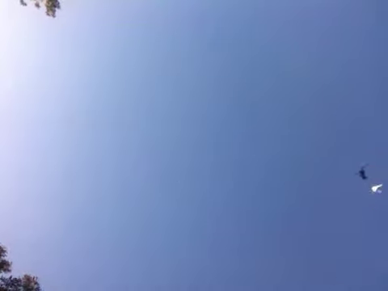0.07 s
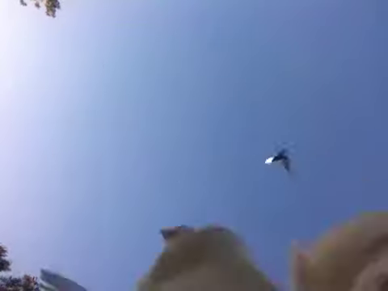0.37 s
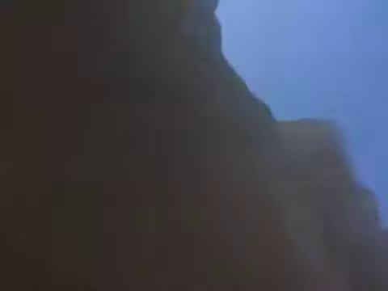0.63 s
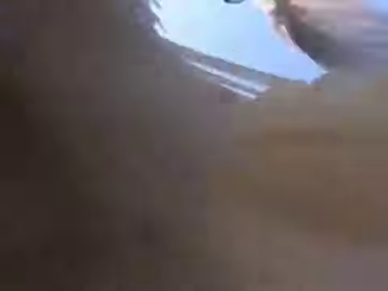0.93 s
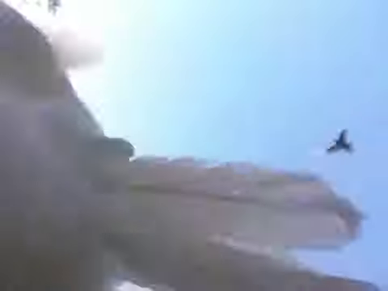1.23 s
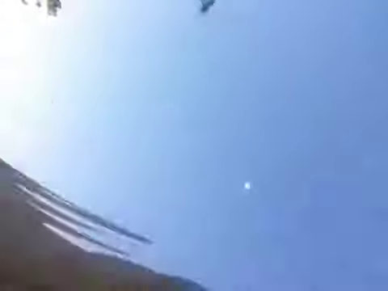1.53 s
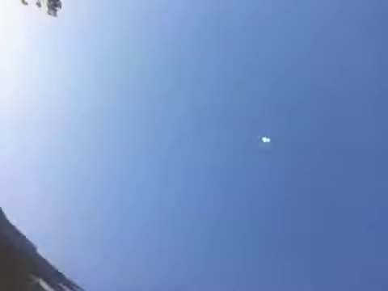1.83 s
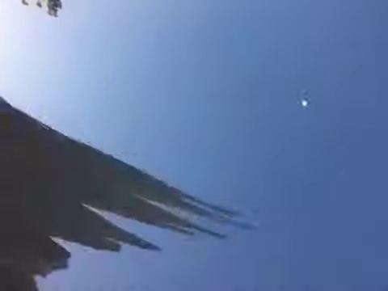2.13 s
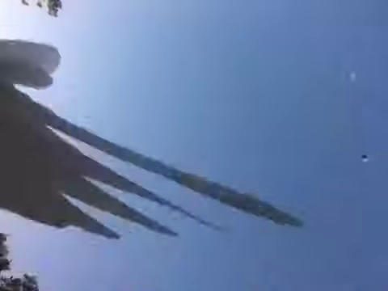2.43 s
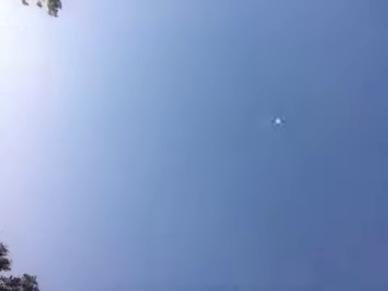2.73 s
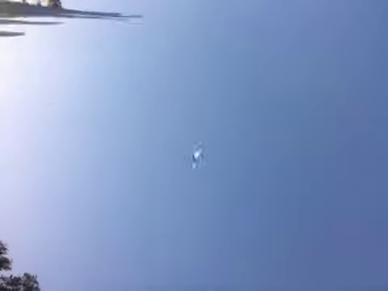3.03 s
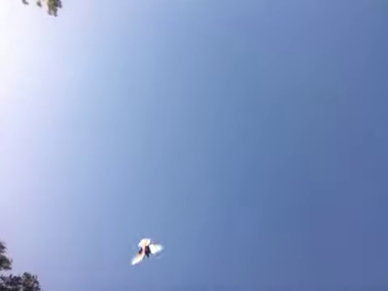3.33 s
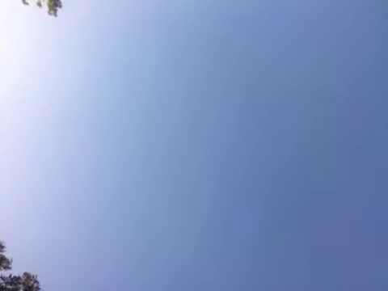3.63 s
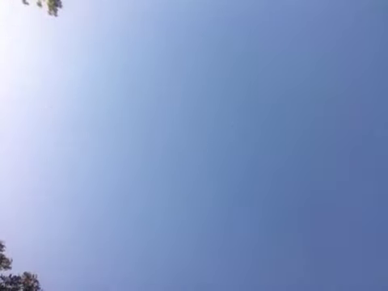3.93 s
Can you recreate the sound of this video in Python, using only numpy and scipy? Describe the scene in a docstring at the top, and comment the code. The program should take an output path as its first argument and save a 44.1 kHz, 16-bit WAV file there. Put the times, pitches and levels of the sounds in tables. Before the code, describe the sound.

A pigeon lands on a small camera outdoors and treads about, its claws clicking, feet thumping and feathers brushing right at the microphone. Near the end, wing flaps buffet the microphone, with low wind rumble underneath.

```python
"""A pigeon lands on a small camera that lies facing the sky, and treads about on it.
Its claws excite the shell by impact, its feet set the housing into damped vibration, and its feathers
brush over it with stick-slip friction; near the end, wing strokes blow on the microphone.
Low wind rumble, faint open air and a fainter electronic whine lie underneath,
and the loudest blows overload the recorder."""
import sys
import numpy as np
from scipy import signal
from scipy.fft import rfft, irfft
from scipy.io import wavfile
from scipy.ndimage import uniform_filter1d

SR = 44100
rng = np.random.default_rng(int(sys.argv[2]) if len(sys.argv) > 2 else 0)


def inscribe(sig):
    """Save sig as 16-bit PCM at rate SR to the path in sys.argv[1].

    A 1-D sig is mono; a 2-D sig holds one channel per row.
    Samples are clipped to [-1, 1] before scaling.
    """
    pcm = np.round(np.clip(np.atleast_2d(sig).T, -1, 1) * 32767)
    wavfile.write(sys.argv[1], SR, pcm.astype(np.int16))


N = 176400
TIME = np.arange(N) / SR
AGE = TIME[:SR // 5]  # time since an impact, t/s

# Levels in all tables are relative: each source applies its own gain.
# Claw impacts: t/s, crack level/dB, knock level/dB, ping f/Hz
CLAW_IMPACTS = [(.620, -0.5, -26, 3900), (.633, 2.5, -13.5, 8700), (0.6416, 4.5, -13, 11100),
                (0.6592, -20, -11.5, 2000), (.6655, -14, -37, 5900), (0.735, -13.5, -16.5, 2940),
                (0.739, -32, -14.5, 1900), (0.7538, -17, -25.5, 3030), (0.761, -18, -27, 3440),
                (0.853, -16, -31, 2450), (.922, -22, -19.5, 1690), (0.9627, -10, -11, 5700),
                (0.9675, -4.5, -16.5, 2940), (1.0363, -25, -26, 1970), (1.0544, -17, -27, 3960),
                (1.075, -10.5, -23.5, 3750), (1.167, -13.5, -19.5, 2700), (1.213, -9.5, -16, 2960),
                (1.232, -8, -24, 2400), (1.2425, -35, -14, 2000), (1.281, -14, -14.5, 2820),
                (1.285, -14, -36, 8900), (1.3209, -8, -6.5, 1800), (1.327, -2, -17.5, 1770),
                (1.332, -3, -9.5, 4500), (1.3701, -23, -31, 7500), (1.379, -9.5, -25, 5430),
                (1.3846, -9.5, -22, 5460), (1.3941, -13.5, -24, 6200), (1.5212, -13.5, -17, 2360),
                (1.5556, -4, -16, 7160), (1.5835, -22, -26, 4400), (1.6193, 1, -19.5, 7900),
                (1.733, -17, -12, 2750), (1.746, 6, -15, 2580), (1.7688, 0, -21, 5400),
                (1.7778, 0.5, -24, 4150), (1.7899, 0, -19, 2360), (1.814, -5.5, -17, 5640),
                (1.818, 0.5, -16, 7920), (1.8954, -25.5, -35, 2230), (1.9228, -33, -34, 5900),
                (1.988, -11.5, -17, 3150), (2.071, -8.5, -47, 6110), (2.2322, -11, -46, 8100),
                (2.2362, -5, -30, 9100), (2.3044, -16.5, -23.5, 4380), (2.3542, -3.5, -48, 7700),
                (2.421, -11, -48, 3680), (2.4635, -9, -25.5, 5900), (2.4745, -10, -42, 6100),
                (2.541, -9, -28, 3500), (2.659, -12, -23, 5450), (2.726, -9, -45, 4030),
                (2.7544, -7, -34, 7800), (2.7606, -6, -21.5, 3770), (2.843, -17.5, -19.5, 2900),
                (2.8977, -12.5, -49, 7200), (2.9004, -3, -50, 4180), (3.0176, -7, -30, 3950),
                (3.1105, -5, -15, 5600), (3.2006, -9.5, -23, 5400), (3.225, -6.5, -35, 8200),
                (3.272, -7.5, -21, 5500), (3.341, -14, -16.5, 1920), (3.44, -28, -32, 5370),
                (3.471, -13.5, -31, 3540), (3.795, -15.5, -23.5, 5800), (3.833, -18, -15, 1880),
                (3.934, -21, -42, 6500)]
# Footfalls and wing bumps: t/s, thump level/dB, nominal f/Hz, decay/s, shell level/dB
FOOTFALLS = [(0.623, -11.5, 164, 0.0098, -30), (0.6369, 1.5, 209, 0.0075, -4.5),
             (0.6606, -1, 266, 0.0048, -3), (0.678, -8.5, 228, 0.0093, -13), (.739, 1.5, 265, 0.0032, -5.5),
             (.76, -10, 191, 0.017, -36), (0.919, -7, 270, 0.0054, -28), (0.966, -0.5, 214, 0.0044, -15),
             (0.987, -23, 104, 0.036, -40), (1.166, -17.5, 242, 0.018, -52),
             (1.243, -1.5, 205, 0.0043, -10), (1.279, -10.5, 272, 0.01, -30),
             (1.294, -1.5, 250, 0.0052, -24), (1.325, -3.5, 310, 0.0049, -13), (1.337, 5, 233, 0.0049, -11),
             (1.387, -5.5, 193, 0.0064, -32), (1.533, 3, 250, 0.0051, -26), (1.556, -7, 303, 0.0054, -34),
             (1.625, -1.5, 248, 0.0052, -16.5), (1.641, -8.5, 130, 0.02, -34),
             (1.733, -7, 303, 0.0048, -22), (1.8196, -2, 236, 0.018, -13), (2.238, -3, 249, 0.012, -0.5),
             (2.304, -20.5, 288, 0.011, -8.5), (2.36, -7, 243, 0.005, -39), (2.47, -14, 248, 0.024, -39),
             (2.528, -5.5, 215, 0.01, -13), (2.544, 7.5, 270, 0.0022, -6),
             (2.555, -4.5, 232, 0.0074, -12.5), (2.763, 2.5, 310, 0.0066, -5.5),
             (2.773, -5.5, 340, 0.0032, -3), (2.843, -5.5, 252, 0.017, -14), (2.9, 1, 263, 0.0025, -12.5),
             (2.908, -4, 222, 0.004, -14), (3.157, -11, 246, 0.022, -13), (3.275, -6, 224, 0.012, -11),
             (3.294, -4.5, 207, 0.0081, -8), (3.314, 4, 125, 0.0071, -0.5), (3.342, 0.5, 240, 0.0059, -3.5),
             (3.387, -10, 303, 0.006, -2.5), (3.445, 0.5, 286, 0.0065, -7),
             (3.485, -16.5, 300, 0.014, -6.5), (3.837, -10, 225, 0.024, -3.5),
             (3.858, -1.5, 270, 0.0086, -3), (3.938, -5, 246, 0.0043, -23)]
# Feather strokes on the shell: t/s, duration/s, hiss level/dB, rasp level/dB
FEATHER_STROKES = [(0.453, 0.15, -48, -40.5), (0.627, 0.012, -25, -26), (0.672, 0.013, -33, -26),
                   (0.81, 0.013, -41, -53), (0.851, 0.042, -39.5, -32), (1.121, 0.01, -29, -21),
                   (1.227, 0.02, -31, -20.5), (1.275, 0.022, -21.5, -21.5), (1.301, 0.029, -32, -22.5),
                   (1.422, 0.02, -41, -45), (1.556, 0.015, -21.5, -24), (1.61, 0.0081, -28, -38),
                   (1.683, 0.013, -34, -29.5), (1.715, 0.0066, -32, -25), (1.773, 0.028, -20.5, -20),
                   (1.839, 0.031, -38.5, -30), (1.975, 0.032, -37, -35), (2.011, 0.015, -27, -36.5),
                   (2.073, 0.06, -34.5, -37.5), (2.144, 0.043, -31.5, -31), (2.226, 0.13, -48, -33.5),
                   (2.351, 0.035, -27, -25), (2.41, 0.02, -35, -22), (2.461, 0.025, -30, -28),
                   (2.49, 0.052, -40.5, -32), (2.537, 0.019, -25, -17), (2.613, 0.1, -45, -63),
                   (2.707, 0.019, -32, -20.5), (2.951, 0.035, -30, -31.5), (3.014, 0.0073, -19.5, -28),
                   (3.195, 0.04, -41, -24.5), (3.388, 0.025, -38.5, -41), (3.437, 0.0099, -26, -23),
                   (3.475, 0.0062, -18.5, -13.5), (3.96, 0.016, -34, -33)]
# Envelopes of the wing strokes: t/s, buffet level/dB, whoosh level/dB, hiss level/dB
WING_ENVELOPES = [(3.04, -19, -47, -57), (3.075, -22.5, -16, -30), (3.11, -27, -14.5, -22.5),
                  (3.14, -16, -24, -36.5), (3.165, -29, -24.5, -43), (3.195, -45, -32, -38),
                  (3.255, -39, -22, -28), (3.29, -14.5, -19.5, -30), (3.345, -15.5, -24, -37.5),
                  (3.365, -28, -56, -86), (3.42, -18, -34, -65), (3.46, -18, -38, -52),
                  (3.50, -18, -31, -40), (3.55, -31, -43, -55), (3.63, -33.5, -31, -43),
                  (3.70, -37, -35, -41), (3.745, -15, -24.5, -36.5), (3.775, -18, -24, -36),
                  (3.797, -12, -12, -29), (3.823, -21, -33, -45), (3.838, -8, -19.5, -29),
                  (3.87, -12, -35, -51), (3.92, -39, -58, -44)]
# Wind and the bird's weight shaking the housing: t/s, level/dB
RUMBLE_ENVELOPE = [(0.0, -61), (0.37, -58), (0.54, -39.5), (0.8, -32.5), (1.01, -33), (1.18, -33),
                   (1.36, -26), (1.49, -32.5), (1.69, -27), (1.87, -27), (1.95, -35), (2.05, -32),
                   (2.14, -26.5), (2.21, -27.5), (2.75, -26), (2.84, -26), (2.97, -29), (3.14, -21.5),
                   (3.29, -24.5), (3.33, -20), (3.53, -27), (3.78, -33.5), (4.0, -21)]
# Modes of the ringing shell and of the rocking housing: f/Hz, decay/s, level/dB
SHELL_MODES = [(728, 0.0059, -2), (917, 0.0037, 0), (1098, 0.0068, -10), (1367, 0.0018, -4.5),
               (540, 0.0029, 1)]
ROCKING_MODES = [(109.1, 0.069, -27), (160.9, 0.017, -11.5)]
# Spectral envelopes: f/Hz, level/dB
CRACK_SPECTRUM = [(500, -38.5), (1500, 4), (2500, 7.5), (4000, 5.5), (7000, 5), (11000, 0), (13000, -9),
                  (16000, -9)]  # hard contact
SHELL_SPECTRUM = [(250, -15), (550, -10), (750, 5.5), (1200, 2.5), (1800, -4.5), (2600, -12), (5000, -48.5)]  # knock or rasp of the shell
HISS_SPECTRUM = [(900, -48), (2000, 0.5), (3500, 5.5), (6000, 0), (8500, 0), (11000, -7), (13000, -9.5),
                 (16000, -28)]  # sliding feathers
SWISH_SPECTRUM = [(900, -0.5), (2000, -11), (3500, 5), (6000, -3.5), (8500, -6.5), (11000, -15),
                  (13000, -17), (16000, -45)]  # wing feathers
BUFFET_SPECTRUM = [(25, -36), (60, -30), (85, -7), (112, 1.5), (160, 11.5), (260, 1), (380, -3.5),
                   (550, -2.5), (1200, -61)]  # air pushed on the microphone
WIND_SPECTRUM = [(25, -41.5), (60, -26.5), (85, -2.5), (112, 1.5), (160, 3), (230, -4), (330, -4.5),
                 (520, -19.5), (740, -14), (1200, -27.5), (2200, -41.5), (6000, -56), (14000, -120)]  # rumble in the housing
AIR_SPECTRUM = [(18, -57), (59, -24), (141, -2.5), (345, -29), (449, -14.5), (569, -25), (913, -14.5),
                (2060, -33.5), (5590, -31.5), (12000, -44), (16000, -46)]  # open air
# Resonances of the shell at the microphone opening: f/Hz, bandwidth/Hz, gain/dB
PORT_RESONANCES = [(736, 76, 1.5), (1538, 15, 4), (5620, 350, 1.5), (6740, 220, 1), (8000, 2550, -1),
                   (11500, 220, 2.5)]
# Microphone response, weak in the deep bass: f/Hz, level/dB
MIC_RESPONSE = [(20, -11), (45, -11), (70, -12.5), (100, -1), (20000, 0.5)]

BARBS_PER_S, CRACKLES_PER_S = 1500, 550  # dense and sparse friction clicks
LANDING_S, TOP_HZ = 0.52, 16000


def claws():
    """Impact excitation: each claw gives a bright crack and a dry knock of the shell."""
    cracks, knocks = np.zeros(N), np.zeros(N)
    for start, crack_db, knock_db, hz in CLAW_IMPACTS:
        add(cracks, start, undb(crack_db) * hard_contact(hz))
        add(knocks, start, undb(knock_db + 15.5) * impulse(tail_s=0.0031, tail_db=2.5))
    return colour(cracks, CRACK_SPECTRUM) + colour(knocks, SHELL_SPECTRUM)


def hard_contact(hz, modes=4):
    """Modal excitation: a hard point chatters on the shell and rings brief modes scattered about hz."""
    chatter = undb(-2.5) * impulse(tail_s=0.0028, tail_db=1.5)
    mode_hz = np.minimum(hz * np.exp(0.18 * rng.standard_normal(modes)), TOP_HZ)
    ping = sum(rng.choice([-1, 1]) * damped_mode(f, decay_s=0.0011) for f in mode_hz)
    return chatter + undb(-12) * ping / np.sqrt(modes)


def impulse(tail_s, tail_db):
    """A brief force is broadband: one impulse and a noise tail with energy tail_db relative to it."""
    tail = rng.standard_normal(len(AGE)) * np.exp(-AGE / tail_s)
    return (AGE == 0) + undb(tail_db) * tail / np.linalg.norm(tail)


def feet():
    """Free vibration: a soft blow bounces the housing, rocks it and rings the shell."""
    out = np.zeros(N)
    onset = 1 - np.exp(-AGE / 0.0018)
    rocking = sum(undb(db) * damped_mode(f, d) for f, d, db in ROCKING_MODES)
    for start, thump_db, hz, decay_s, shell_db in FOOTFALLS:
        # The pitch sags as the bounce dies away.
        bounce_hz = hz * (0.7056 + 0.464 * np.exp(-AGE / (1.82 * decay_s)))
        bounce = np.sin(2 * np.pi * np.cumsum(bounce_hz) / SR) * np.exp(-AGE / decay_s)
        shell = sum(undb(db) * rng.choice([-1, 1]) * damped_mode(f * rng.normal(1, 0.068), d)
                    for f, d, db in SHELL_MODES)
        thump = undb(thump_db + 2) * (bounce + rocking)
        add(out, start, onset * (thump + undb(shell_db - 4) * shell))
    return out


def damped_mode(hz, decay_s):
    """Damped harmonic oscillator: a sinusoid with exponential decay."""
    return np.sin(2 * np.pi * hz * AGE) * np.exp(-AGE / decay_s)


def feathers(attack_s=0.0034, release_s=0.0017):
    """Sliding friction: short feather strokes draw a grainy hiss and a lower rasp from the shell."""
    hiss, rasp = np.zeros(N), np.zeros(N)
    for start, duration, hiss_db, rasp_db in FEATHER_STROKES:
        attack = np.clip((TIME - start) / attack_s, 0, 1)
        release = np.exp(-np.maximum(TIME - start - duration, 0) / release_s)
        hiss += undb(hiss_db - 5.5) * attack * release
        rasp += undb(rasp_db - 5.5) * attack * release
    return moving_contact(hiss * barbs(HISS_SPECTRUM) + rasp * barbs(SHELL_SPECTRUM))


def barbs(spectrum, per_s=BARBS_PER_S):
    """Stick-slip friction: feather barbs catch and release in uneven clicks over smooth noise."""
    slips = (rng.random(N) < per_s / SR) * rng.choice([-1, 1], N)
    strength = undb(3 * np.minimum(rng.exponential(size=N), 4))
    friction = unit_rms(slips * strength) + 0.4 * rng.standard_normal(N)
    return unit_rms(colour(friction, spectrum)) * flutter(rate_hz=87.9, depth_db=2.5)


def moving_contact(x, bands=20):
    """Response depends on the driving point: as the contact moves, each band swells and fades alone."""
    centre_hz = np.geomspace(627, TOP_HZ, bands)
    hz, spectrum = np.fft.rfftfreq(N, 1 / SR), rfft(x)
    return sum(irfft(spectrum * np.interp(hz, centre_hz, band), N) * flutter(rate_hz=27.92, depth_db=4)
               for band in np.eye(bands))


def wings():
    """Air displacement and friction: wings buffet the microphone as feathers scrape in gritty pulses."""
    whoosh = undb(-4.5) * envelope(WING_ENVELOPES, 2) * barbs(SHELL_SPECTRUM)
    hiss = undb(-1.5) * envelope(WING_ENVELOPES, 3) * barbs(SWISH_SPECTRUM, CRACKLES_PER_S)
    buffet = undb(-1.5) * envelope(WING_ENVELOPES, 1) * noise(BUFFET_SPECTRUM)
    return buffet + moving_contact(whoosh + hiss) * flutter(rate_hz=70.2, depth_db=2)


def shuffle(ticks_per_s=45):
    """Light impact and friction: the restless bird ticks at random; its rubbing follows the rumble."""
    ticks = np.zeros(N)
    for _ in range(int(ticks_per_s * N / SR)):
        strength, pitch = rng.standard_normal(2)
        tick_db, tick_hz = -43 + 13.5 * strength, 4100 * np.exp(0.39 * pitch)
        add(ticks, rng.random() * N / SR, undb(tick_db) * hard_contact(tick_hz))
    rubbing = undb(-19.5) * barbs(SHELL_SPECTRUM)
    crackle = undb(-31) * barbs(HISS_SPECTRUM, CRACKLES_PER_S)
    friction = envelope(RUMBLE_ENVELOPE, 1) * (rubbing + crackle)
    return (TIME > LANDING_S) * (colour(ticks, CRACK_SPECTRUM) + friction)


def wind():
    """Forced vibration: wind and the bird's weight shake the housing unsteadily, over quiet open air."""
    rumble = undb(3.5) * envelope(RUMBLE_ENVELOPE, 1) * noise(WIND_SPECTRUM)
    return rumble * flutter(rate_hz=14, depth_db=3.5) + undb(-52.5) * noise(AIR_SPECTRUM)


def whine(hz=15000):
    """Pure tone: the electronics give a faint, steady sinusoid."""
    return undb(-77) * np.sin(2 * np.pi * hz * TIME)


def undb(db):
    """Amplitude ratio of a level in decibels."""
    return 10 ** (np.asarray(db) / 20)


def unit_rms(x):
    """Normalisation to an rms of 1."""
    return x / np.sqrt(np.mean(x ** 2))


def add(out, start, sound):
    """Superposition of a sound on out from time start."""
    i = max(int(start * SR), 0)
    out[i:i + len(sound)] += sound[:max(N - i, 0)]


def colour(x, spectrum, size=8192):
    """Minimum-phase filtering at unit power gain through points of f/Hz, level/dB."""
    hz, db = np.array(spectrum).T
    log_hz = np.log(np.fft.rfftfreq(size, 1 / SR) + 1)
    gain = unit_rms(undb(np.interp(log_hz, np.log(hz), db)))
    cepstrum = irfft(np.log(gain))
    cepstrum[1:size // 2] *= 2  # folding the cepstrum makes the filter causal
    cepstrum[size // 2 + 1:] = 0
    return signal.oaconvolve(x, irfft(np.exp(rfft(cepstrum))))[:N]


def noise(spectrum):
    """Spectrally shaped Gaussian noise of rms 1."""
    return unit_rms(colour(rng.standard_normal(N), spectrum))


def flutter(rate_hz, depth_db):
    """Random amplitude modulation: a gain that wanders within bounds."""
    hold = max(int(SR / rate_hz), 1)
    steps = rng.standard_normal(N)[np.arange(N) // hold]
    wander = np.tanh(uniform_filter1d(steps, hold))
    return unit_rms(undb(depth_db * unit_rms(wander)))


def envelope(rows, column):
    """Amplitude envelope interpolated along a level column, silent outside its span."""
    rows = np.array(rows)
    return undb(np.interp(TIME, rows[:, 0], rows[:, column], left=-120, right=-120))


def scene():
    """Superposition: all sources sum at one microphone."""
    return (claws() + feathers() + feet() + wings() + wind() + shuffle() + whine())[None]


def record(dry, ceiling=0.63, knee=13):
    """Resonance and saturation: the opening colours the sound, bass drops, peaks flatten, top is cut."""
    x = dry[0]
    resonances = sum((undb(db) - 1) * signal.lfilter(*signal.iirpeak(hz, hz / width, fs=SR), x)
                     for hz, width, db in PORT_RESONANCES)
    x = colour(x + resonances, MIC_RESPONSE)
    saturated = x / (1 + np.abs(x / ceiling) ** knee) ** (1 / knee)
    lowpass = signal.ellip(8, 0.2, 70, TOP_HZ, fs=SR, output="sos")
    return signal.sosfilt(lowpass, saturated)[None]


dry = scene()
out = record(dry)
inscribe(out)
```